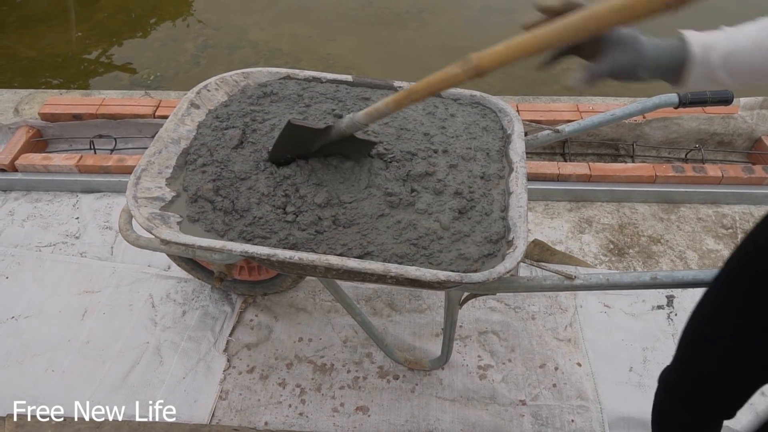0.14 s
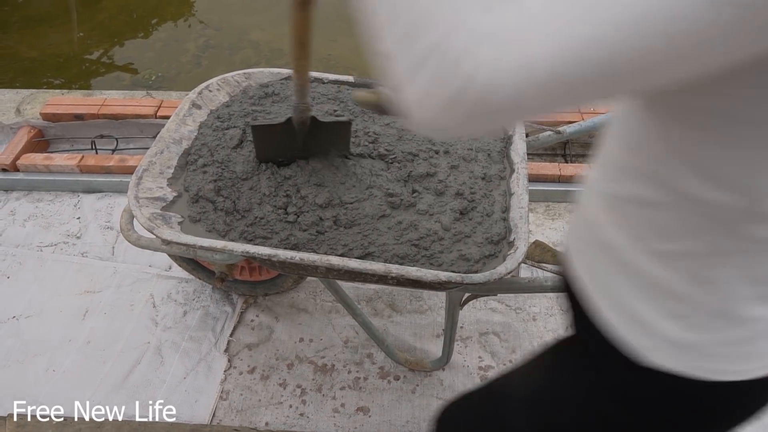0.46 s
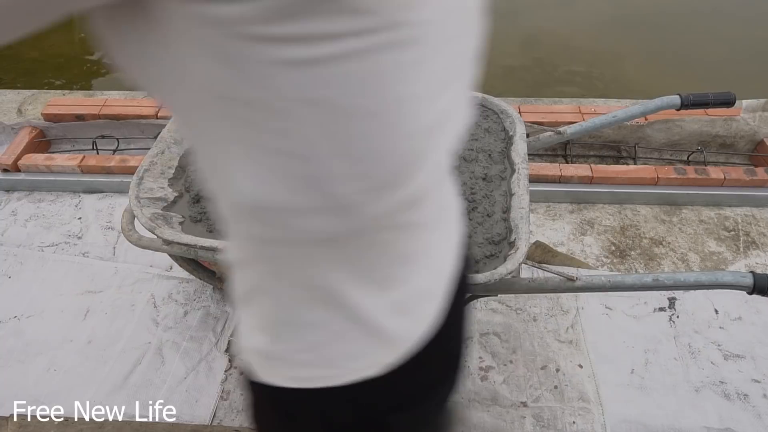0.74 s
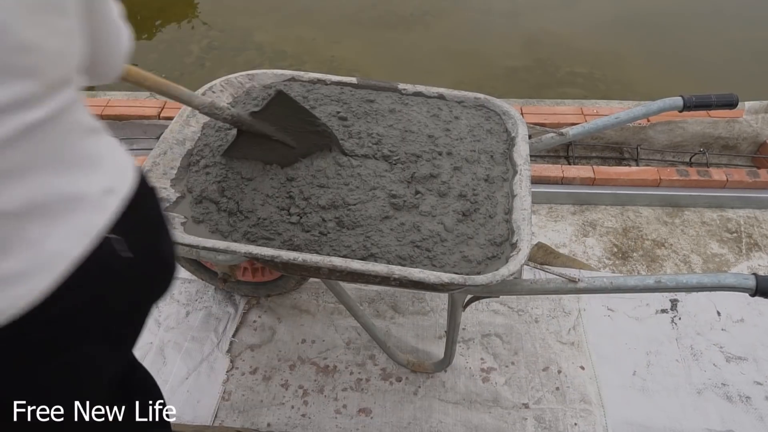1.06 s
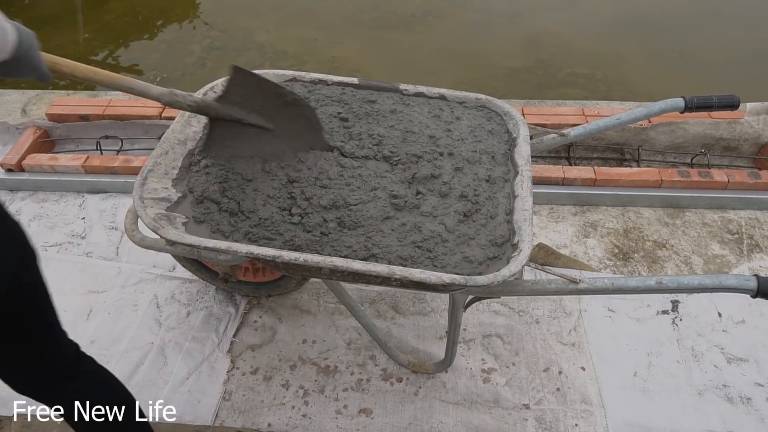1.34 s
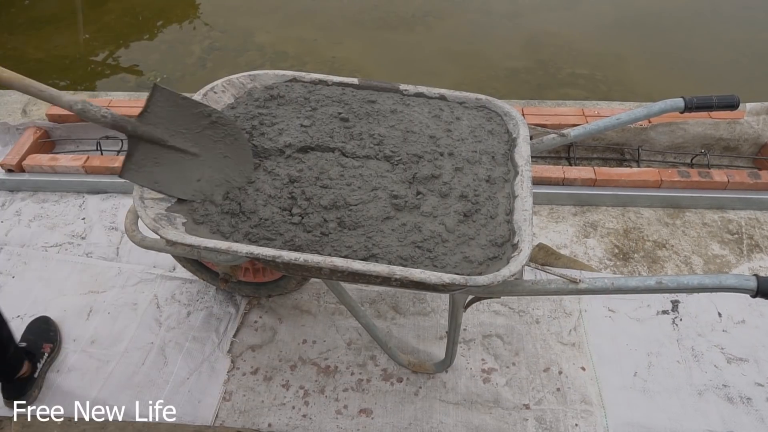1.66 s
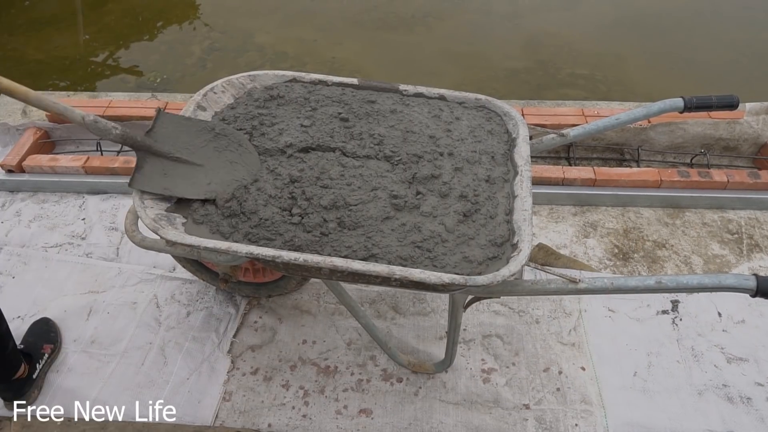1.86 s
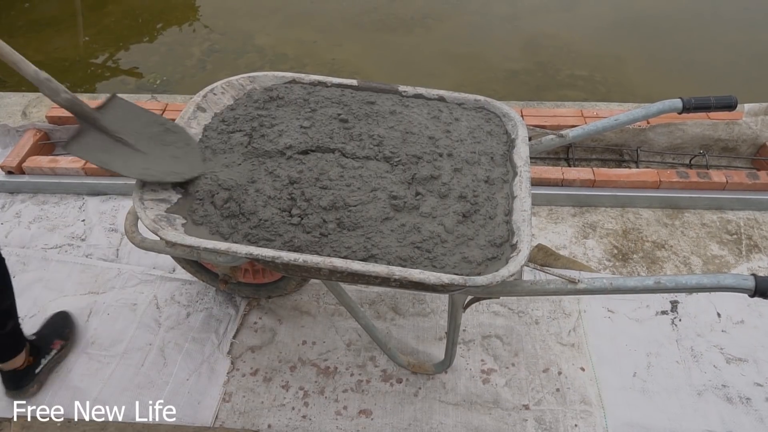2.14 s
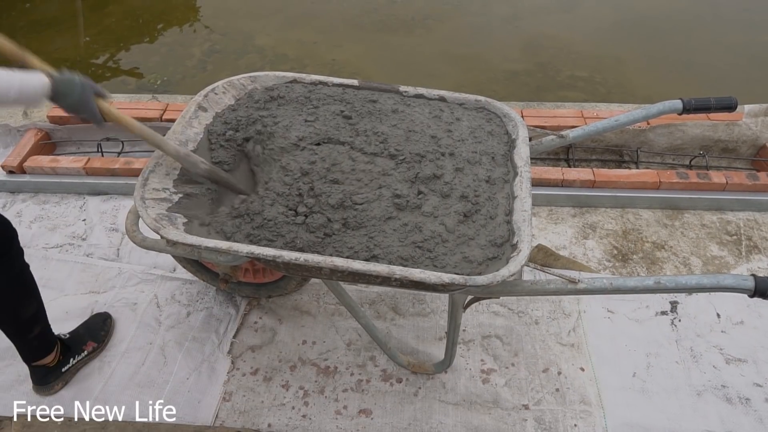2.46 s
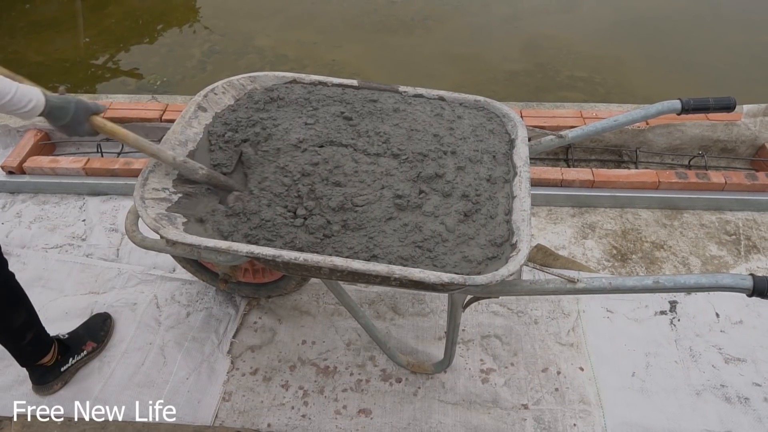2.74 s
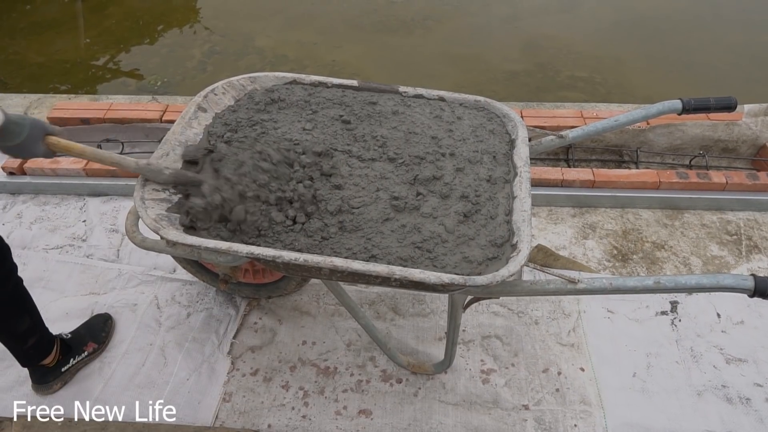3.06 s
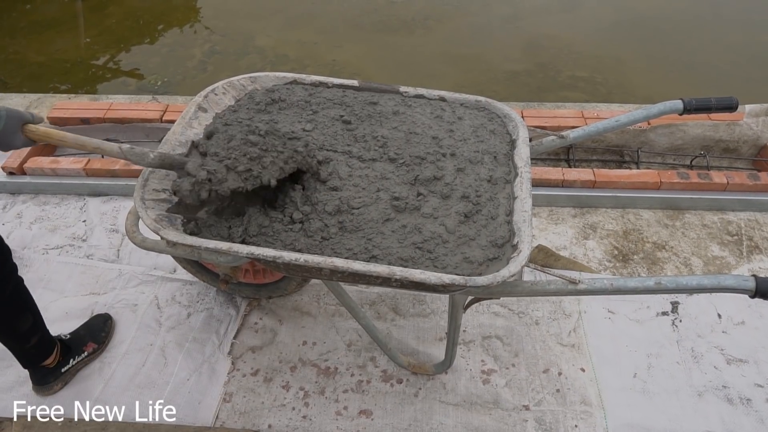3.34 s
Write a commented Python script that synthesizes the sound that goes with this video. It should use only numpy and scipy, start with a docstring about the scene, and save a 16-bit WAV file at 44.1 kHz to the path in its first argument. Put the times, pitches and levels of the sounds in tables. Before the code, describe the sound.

Gritty shovel scraping in a wheelbarrow of wet concrete, with stones clicking against the blade.

```python
"""Outdoors, a shovel is dragged over and pushed into wet concrete in a metal wheelbarrow.
Grit crackles under the blade and stones knock it. The scraping makes the blade ring, lower as it
sinks deeper. It settles with dull thuds, and an air pocket gulps as it lifts. Behind it are soft
outdoor noise, a far engine's hum, wind on the microphone, one bird chirp and a brief high hiss."""
import sys
import numpy as np
from scipy import signal
from scipy.io import wavfile
from scipy.ndimage import uniform_filter1d

SR = 44100
rng = np.random.default_rng(int(sys.argv[2]) if len(sys.argv) > 2 else 0)


def generate_wav(sig):
    """Save sig (samples, or channels by samples) to the path in sys.argv[1] as 16-bit PCM at SR."""
    pcm = np.round(np.clip(np.atleast_2d(sig).T, -1, 1) * 32767).astype(np.int16)
    wavfile.write(sys.argv[1], SR, pcm)


N = 154350
TIME = np.arange(N) / SR

# How loud the scraping is: t/s, level/dB
SCRAPE_LOUDNESS = [(0.0, -46.5), (0.18, -49), (0.2, -45.5), (0.34, -43), (0.635, -41), (0.68, -44.5),
                   (0.93, -47), (0.96, -42.5), (0.97, -42), (1.01, -41), (1.025, -44.5), (1.09, -44.5),
                   (1.11, -37), (1.125, -45), (1.18, -43.5), (1.23, -47), (1.41, -36.5), (1.49, -36),
                   (1.5, -43), (1.59, -61.5), (1.66, -61), (1.68, -34.5), (1.69, -31.5), (1.83, -43.5),
                   (1.925, -37.5), (1.96, -53.5), (1.99, -50.5), (2.02, -29.5), (2.072, -34),
                   (2.085, -45.5), (2.1, -39.5), (2.11, -46.5), (2.14, -35.5), (2.16, -47), (2.2, -41),
                   (2.225, -33.5), (2.245, -46), (2.27, -34.5), (2.28, -33), (2.58, -33), (2.65, -44),
                   (2.69, -36.5), (3.14, -32.5), (3.21, -53.5), (3.26, -37), (3.3, -38.5), (3.36, -43),
                   (3.39, -52), (3.47, -55), (3.5, -40)]
def shovel_scraping():
    """The blade rubs over grit and rings with it; the harder it digs, the more it crunches."""
    (level_db,) = in_time(SCRAPE_LOUDNESS)
    effort = from_db(.8 * np.minimum(level_db - level_db.max() + 6, 0))   # 1 in the loudest 6 dB
    clumps = from_db(4 * drift(40))   # clicks come in bunches
    grains = clicks(per_s=6000 * clumps, spread_db=3)
    cracks = clicks(per_s=250 * clumps, spread_db=3.5)
    snap_fade_s = .007   # each crack becomes a snap, a tiny burst of noise
    bursts = signal.lfilter([1], [1, -from_db(-60 / (snap_fade_s * SR))], np.abs(cracks))
    snaps = effort * rms_one(bursts * rng.standard_normal(N))
    slurry = rng.standard_normal((2, N))   # the hiss of the wet mix
    grit = wet_grit(grains, snaps, slurry, level_db, effort)
    ringing = blade_ringing(grains + snaps + slurry[0])
    gravel = from_db(-9) * effort * gravel_ticks()
    crunch = from_db(2 * np.sqrt(effort) * drift(69))
    return crunch * (grit + from_db(level_db) * (ringing + gravel))


# The tone of the grit, from low to high: f/Hz, level/dB
GRIT_TONE = [(150, -22.5), (264, -19.5), (410, -13), (640, -17), (850, -10), (1120, -8), (1400, -12.5),
             (2040, -12.5), (3000, -14.5), (4500, -15), (7300, -22.5), (8800, -44), (15500, -32)]
# How its bass and its treble rise and fall around their averages: t/s, level/dB
GRIT_BASS = [(0.0, -62), (0.57, -58.5), (0.62, -48.5), (0.67, -64.5), (1.26, -61), (1.37, -51.5),
             (1.65, -71), (1.7, -53.5), (1.98, -71), (2.03, -34.5), (2.14, -63), (2.61, -48.5),
             (2.71, -39.5), (2.99, -42.5), (3.16, -40.5), (3.21, -52.5), (3.26, -41.5), (3.5, -71.5)]
GRIT_TREBLE = [(0.0, -57), (0.5, -45.5), (0.63, -48.5), (0.69, -59.5), (1.3, -48.5), (1.48, -40.5),
               (1.51, -58.5), (1.66, -67), (1.68, -42), (1.72, -42.5), (1.92, -54.5), (1.98, -64),
               (2.02, -43), (2.23, -45), (2.24, -67), (2.27, -39.5), (2.6, -43.5), (2.63, -54),
               (2.7, -44.5), (3.06, -41.5), (3.21, -49.5), (3.28, -40), (3.39, -57.5), (3.5, -58.5)]
def wet_grit(grains, snaps, slurry, level_db, effort):
    """Each grain rings at its own pitch, while snaps and hissing slurry cover all pitches."""
    bass_below_hz, treble_above_hz = 836, 4900
    # bass and treble share the scraping's average level and its fast flutter
    flutter_db = level_db - uniform_filter1d(level_db, size=int(.05 * SR))
    bass_db, treble_db = (curve - curve.mean() + level_db.mean() + flutter_db
                          for curve in in_time(GRIT_BASS) + in_time(GRIT_TREBLE))
    grain_band = rng.integers(0, 27, N)
    out = 0
    for k, hz in enumerate(np.geomspace(170, 15000, 27)):
        pings = resonance(grains * (grain_band == k), hz, width_hz=hz / 5.8)
        pings = rms_one(band(pings, hz / 2, hz * 2))
        hiss = from_db(10) * slurry[k % 2] + from_db(-3) * snaps
        hiss = rms_one(band(hiss, hz / 2 ** (1 / 8), hz * 2 ** (1 / 8)))
        bass = np.clip(.5 + 2 * np.log2(bass_below_hz / hz), 0, 1)
        treble = np.clip(.5 + np.log2(hz / treble_above_hz), 0, 1)
        db = bass * bass_db + treble * treble_db + (1 - bass - treble) * level_db
        flicker_db = 3.4 * np.sqrt(effort) * drift(10.2)
        out += (pings + hiss) * np.sqrt(hz / 9000) * from_db(at_hz(GRIT_TONE, hz) + db + flicker_db)
    return out


# Blade notes that come and go: t/s, length/s, f/Hz, width/Hz, level/dB relative to the scraping
BLADE_NOTES = [(2.046, 0.12, 2016, 70, -1), (2.05, 0.294, 3865, 110, -11), (2.171, 0.051, 2760, 300, -3),
               (2.206, 0.082, 2160, 150, -5), (2.343, 0.082, 1560, 89.4, -6.5), (2.394, 0.37, 1130, 80, -7),
               (2.396, 0.23, 2250, 200, -10.5), (2.817, 0.019, 2840, 300, 3.5),
               (2.876, 0.22, 856, 120, -10), (3.242, 0.089, 1130, 198, -6.5), (1.364, 0.32, 1470, 304, -9),
               (1.707, 0.16, 1130, 200, -9.5), (0.2, 0.25, 7160, 397, -21.5),
               (0.454, 0.21, 4970, 397, -13.5)]
# High blade notes on the bare tub: f/Hz, level/dB relative to the scraping
BARE_TUB_NOTES = [(2970, -15.5), (3300, -12), (4650, -14), (5440, -32), (6450, -20.5)]
def blade_ringing(shake):
    """Scraping shakes the blade; as the mix muffles different parts of it, different notes ring."""
    sinks_s, fade_s = 1.44, .041
    on_surface = np.clip((sinks_s - TIME) / fade_s, 0, 1)
    out = on_surface * from_db(-7.5) * rms_one(resonance(shake, hz=1050, width_hz=350))
    for start, length, hz, width_hz, db in BLADE_NOTES:
        free = on_between(start, start + length, fade_s)
        out += free * from_db(db) * rms_one(resonance(shake, hz, width_hz))
    on_tub = on_between(2.04, 2.34, fade_s)
    for hz, db in BARE_TUB_NOTES:
        out += on_tub * from_db(db + 2.9 * drift(13)) * rms_one(resonance(shake, hz, width_hz=64))
    return out


def gravel_ticks():
    """Single bits of gravel tick, each at one of twelve pitches."""
    ticks, tick_band = clicks(per_s=250, spread_db=3), rng.integers(0, 12, N)
    out = 0
    for k, hz in enumerate(np.geomspace(800, 5200, 12)):
        pings = resonance(ticks * (tick_band == k), hz, width_hz=500)
        out += resonance(pings, hz, width_hz=1000) / np.sqrt(hz)
    return rms_one(out)


# Stones hitting the blade: t/s, level/dB, f/Hz, crack level/dB relative to the ring
STONE_HITS = [(0.613, -27, 998, -19), (0.6377, -31.5, 1120, -25), (0.9678, -31.5, 2100, -21),
              (1.432, -24.5, 1044, -30), (1.48, -25.5, 1630, -12), (1.6802, -24.5, 2080, 6.5),
              (1.7128, -28, 3640, -7), (1.8196, -37, 3690, -12), (1.8477, -34, 3620, -4),
              (1.903, -32, 2420, -4), (2.0952, -18.5, 2055, -24), (2.1918, -25.5, 2400, -2),
              (2.2026, -20, 3130, -21), (2.2194, -36, 2160, -20.5), (2.2665, -23, 3830, -10),
              (2.346, -24.5, 1520, -11), (2.6898, -24.5, 1130, -30), (2.7674, -23, 1850, -39),
              (2.823, -26, 3080, -15.5), (2.879, -37.5, 1000, 10), (2.8965, -36, 5740, 3),
              (2.9143, -22, 794, -14), (2.977, -24, 1930, 0), (2.9953, -26, 1950, -7),
              (3.0295, -26.5, 745, -15), (3.0984, -29, 864, -3), (3.116, -29, 2030, -1),
              (3.23, -30.5, 840, -3), (3.246, -30.5, 910, -25), (3.276, -33, 1160, -8)]
def stone_knocks():
    """Each stone gives a short, rough ring and a sharp crack of noise."""
    ring_fade_s, crack_fade_s = .034, .007   # time to fade by 60 dB
    out, t = np.zeros(N), TIME[:2000]
    for start, db, hz, crack_db in STONE_HITS:
        noise = rng.standard_normal(len(t))
        tone = np.sin(2 * np.pi * hz * t) + rms_one(resonance(noise, hz, width_hz=146))
        ring = from_db(-60 * t / ring_fade_s) * tone / 2
        burst = from_db(-60 * t / crack_fade_s) * noise
        crack = band(burst, 1200, 6000) + from_db(-9) * burst
        out[int(start * SR):][:len(t)] += from_db(db) * (ring + from_db(crack_db) * crack)
    return out


# The blade settling: t/s, level/dB
SETTLING = [(0.614, -38), (2.012, -34.5)]
def blade_thuds(hz=186, fade_s=.045):
    """The blade settles with a dull thud, a low tone that dies quickly."""
    out = 0
    for start, db in SETTLING:
        age = np.maximum(TIME - start, 0)
        out += from_db(db - 60 * age / fade_s) * np.sin(2 * np.pi * hz * age)
    return out


def air_gulp(start_s=3.075, length_s=.12, from_hz=415, to_hz=490):
    """An air pocket under the lifting blade gulps with a wavering, rising tone."""
    progress = np.clip((TIME - start_s) / length_s, 0, 1)
    hz = from_hz + (to_hz - from_hz) * progress + 10 * drift(32)
    return from_db(-38 + 3 * progress + 2.5 * drift(54)) * arch(progress) * np.sin(phase_of(hz))


# How loud the hum and the wind rumble sound: t/s, hum level/dB, rumble level/dB
# The dip near 2.44 s stands for the recorder's gain control turning both down under loud scraping.
HUM_AND_RUMBLE = [(0.0, -54.5, -43), (0.15, -56.5, -58.5), (0.33, -57, -43), (0.41, -54.5, -57),
                  (1.2, -62, -46), (1.29, -58.5, -52), (2.02, -63.5, -43.5), (2.08, -65, -61.5),
                  (2.32, -70, -45.5), (2.44, -95, -75), (2.63, -67.5, -50), (3.46, -59, -56),
                  (3.5, -59, -49)]
def engine_and_wind(from_hz=71.5, to_hz=76.3, rise_s=2.4):
    """A far engine hums, slowly rising in pitch; gusts of wind rumble on the microphone."""
    hum_db, rumble_db = in_time(HUM_AND_RUMBLE)
    phase = phase_of(np.interp(TIME, [0, rise_s], [from_hz, to_hz]) + 1.5 * drift(4))
    tone = np.sin(phase) + from_db(-7) * np.sin(2 * phase)
    hum = np.sqrt(2) * from_db(hum_db + 2.56 * drift(37)) * tone
    gusts = from_db(-2 * drift(6))
    rumble = band(band(rng.standard_normal(N), 10.5, 32.7), 4.1, 41)
    return hum + from_db(rumble_db) * rms_one(gusts * rumble)


# The tone of the outdoor noise: f/Hz, level/dB
AIR_TONE = [(24, -28), (58, -4), (162, 5), (289, -22), (488, -24), (526, -58), (2250, -26), (4410, -45),
            (15800, -59)]
def outdoor_air():
    """Soft, steady noise, built from bands half an octave wide."""
    noise, edges = rng.standard_normal((2, N)), 40 * 2 ** np.arange(0, 9.1, .5)
    air = sum(from_db(at_hz(AIR_TONE, np.sqrt(low * high))) * band(noise[k % 2], low, high)
              for k, (low, high) in enumerate(zip(edges, edges[1:])))
    return from_db(-65.5) * rms_one(air)


def bird_chirp(start_s=1.612, length_s=.047, from_hz=5000, to_hz=3550):
    """A bird gives one rough, falling whistle."""
    progress = np.clip((TIME - start_s) / length_s, 0, 1)
    hz = from_hz + (to_hz - from_hz) * progress ** 2 + 200 * drift(300)
    return from_db(-62.5 + 4 * drift(150)) * arch(progress) * np.sin(phase_of(hz))


# A brief hiss: t/s, length/s, lowest f/Hz, highest f/Hz, level/dB
HIGH_HISS = [(0.846, 0.04, 8600, 13400, -62)]
def faint_hiss():
    """High noise switches on and off again."""
    noise = rng.standard_normal(N)
    return sum(from_db(db) * ((TIME > start) & (TIME < start + length)) * rms_one(band(noise, low, high))
               for start, length, low, high, db in HIGH_HISS)


def from_db(db):
    """Turn decibels into a number to multiply by."""
    return 10 ** (np.asarray(db) / 20)


def rms_one(x):
    """Scale a sound to an average power of 1."""
    return x / np.sqrt(np.mean(x ** 2) + 1e-20)


def in_time(rows):
    """Join a table's points into one curve for each level column."""
    times, *columns = np.transpose(rows)
    return [np.interp(TIME, times, column) for column in columns]


def at_hz(rows, hz):
    """Look up a tone table's level at one pitch."""
    pitches, levels = np.transpose(rows)
    return np.interp(np.log(hz), np.log(pitches), levels)


def on_between(start_s, end_s, fade_s):
    """Fade in to 1, hold, and fade out."""
    return np.clip(np.minimum(TIME - start_s, end_s - TIME) / fade_s + .5, 0, 1)


def arch(progress):
    """Swell and fade as progress goes from 0 to 1."""
    return np.sqrt(4 * progress * (1 - progress))


def phase_of(hz):
    """The running angle of a wave whose pitch changes."""
    return 2 * np.pi * np.cumsum(hz) / SR


def drift(hz):
    """A smooth random wobble of about 1 either way; more hz makes it faster."""
    r = np.exp(-40 * np.pi * hz / SR)
    slow = signal.lfilter([1], [1, -2 * r, r * r], rng.standard_normal(N // 20 + 2002))[2000:]
    return np.interp(np.arange(N) / 20, np.arange(len(slow)), rms_one(slow))


def band(x, low_hz, high_hz):
    """Keep the sound between two pitches."""
    sos = signal.butter(2, [low_hz, min(high_hz, .45 * SR)], "band", fs=SR, output="sos")
    return signal.sosfilt(sos, x + 1e-18)


def resonance(x, hz, width_hz):
    """Make a sound ring at one pitch; narrower rings longer."""
    r = np.exp(-np.pi * width_hz / SR)
    feedback = [1, -2 * r * np.cos(2 * np.pi * hz / SR), r * r]
    return signal.lfilter([(1 - r * r) / 2, 0, (r * r - 1) / 2], feedback, x + 1e-18)


def clicks(per_s, spread_db):
    """Random clicks of uneven size and sign."""
    sizes = from_db(spread_db * np.minimum(rng.exponential(1, N), 3.5)) * rng.choice([-1, 1], N)
    return rms_one(sizes * (rng.random(N) < per_s / SR))


def scene():
    """Add the shovel and the background into one channel."""
    shovel = shovel_scraping() + stone_knocks() + blade_thuds() + air_gulp()
    return (shovel + engine_and_wind() + outdoor_air() + bird_chirp() + faint_hiss())[None]


def record(dry):
    """Round off the loudest peaks and cut the highest treble."""
    peak, cutoff_hz = .13, 16500
    rounded = peak * np.tanh(dry / peak)
    return signal.sosfilt(signal.cheby2(14, 70, cutoff_hz, fs=SR, output="sos"), rounded)


dry = scene()
out = record(dry)
generate_wav(out)
```